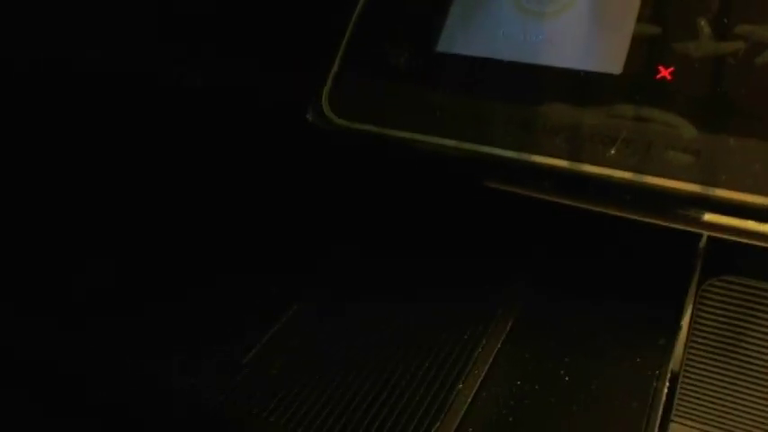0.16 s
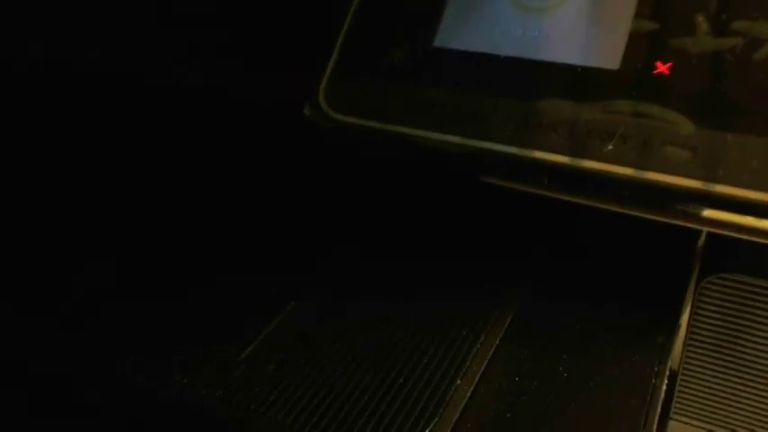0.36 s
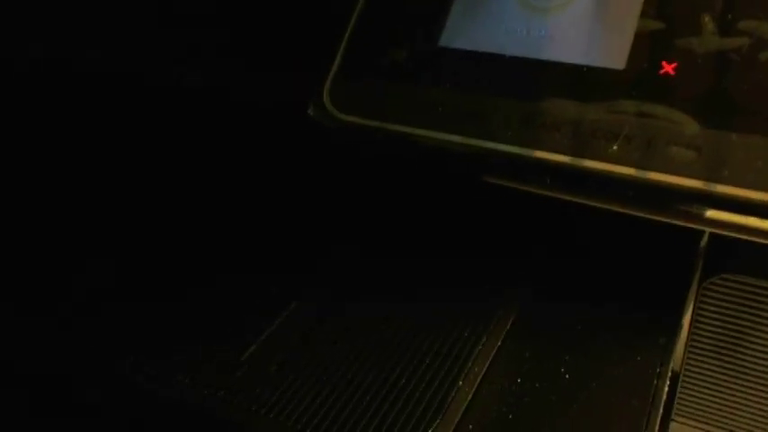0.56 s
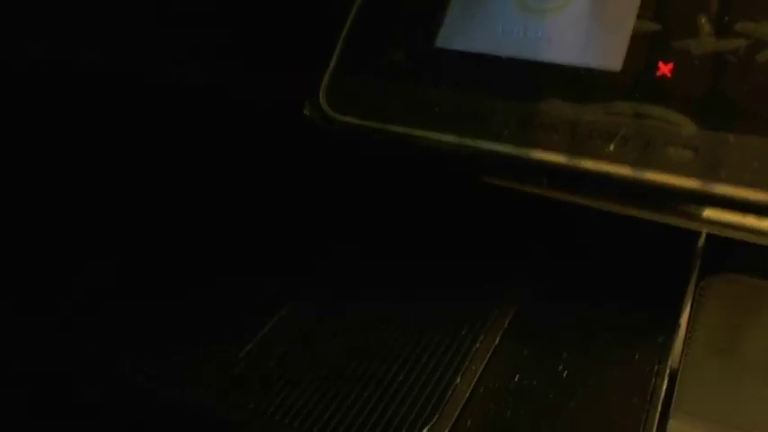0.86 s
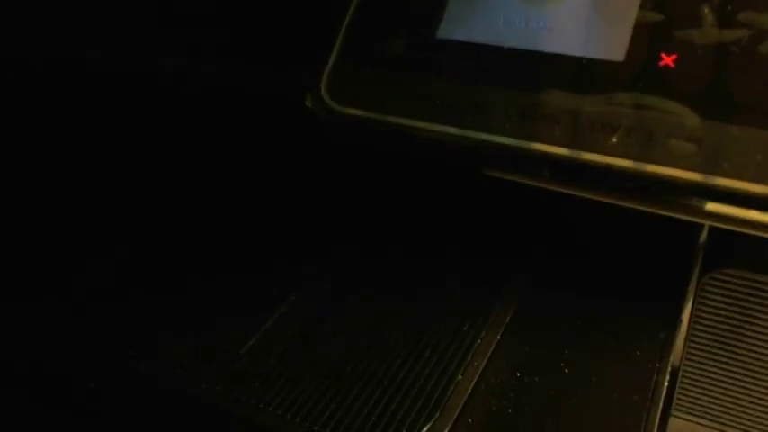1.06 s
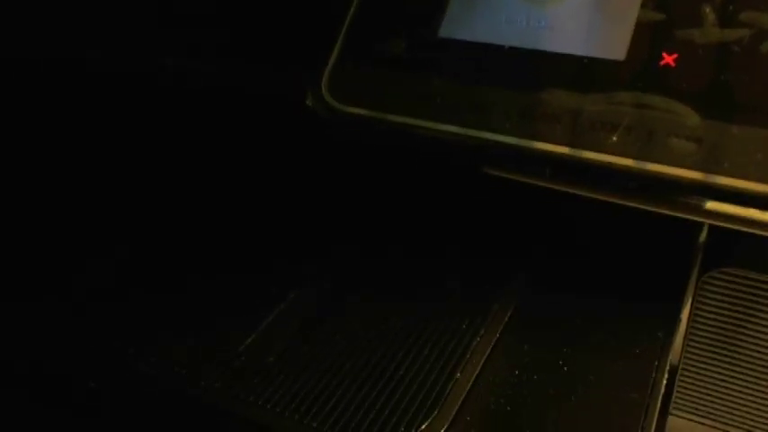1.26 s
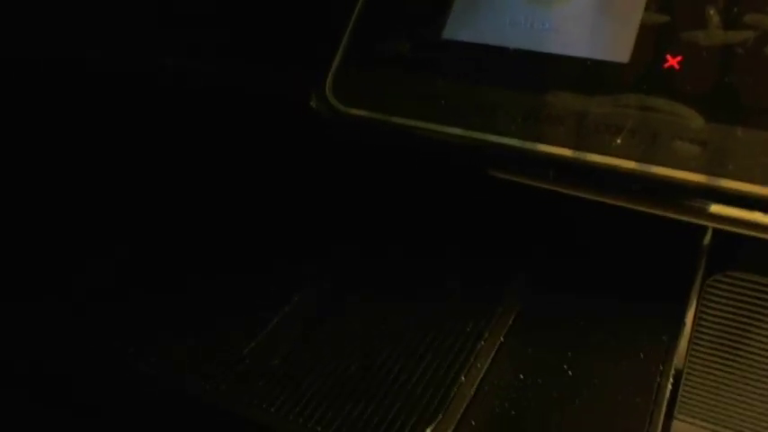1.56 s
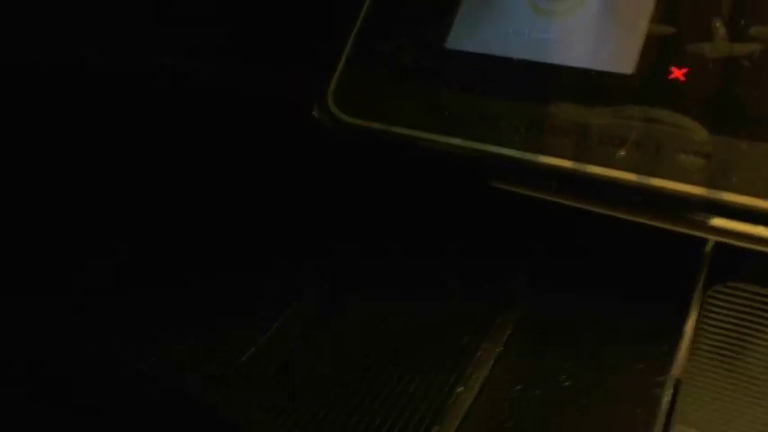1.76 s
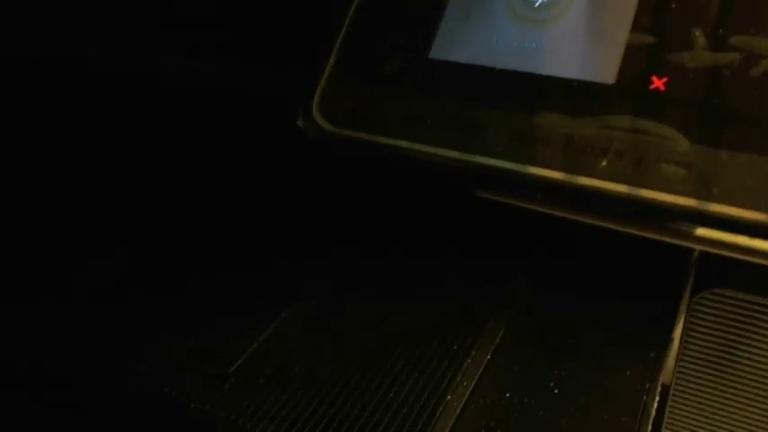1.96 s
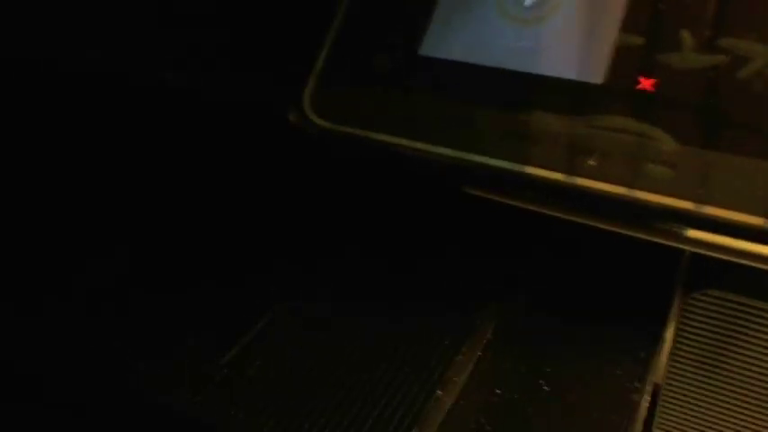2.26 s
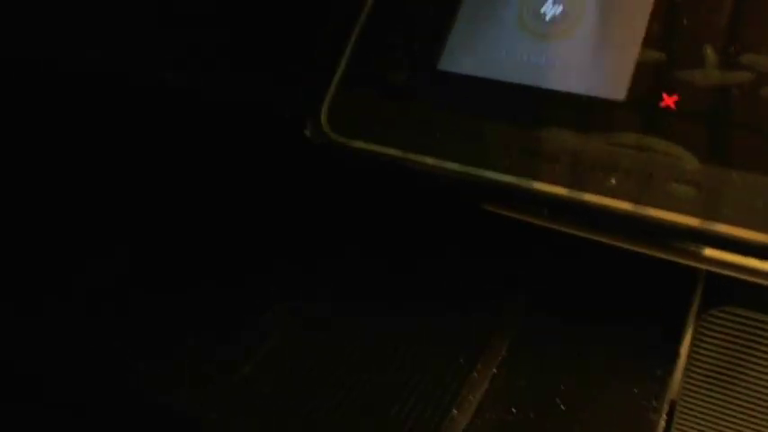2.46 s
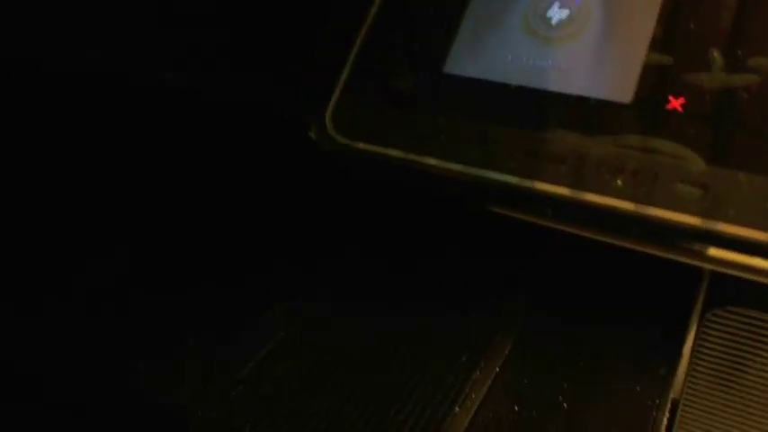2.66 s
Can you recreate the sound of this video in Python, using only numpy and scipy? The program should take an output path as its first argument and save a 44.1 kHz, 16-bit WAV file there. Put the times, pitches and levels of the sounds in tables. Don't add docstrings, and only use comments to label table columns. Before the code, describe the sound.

Inkjet printer heard close on a phone indoors: thin motor whine and low hum, a rail squeal in the first second, then four evenly spaced ticks each followed by a rattling plastic clack; hum swells near the end.

```python
import sys
import numpy as np
from scipy import signal
from scipy.fft import rfft, irfft, next_fast_len
from scipy.io import wavfile
from scipy.ndimage import uniform_filter1d, map_coordinates

SR = 44100
rng = np.random.default_rng(int(sys.argv[2]) if len(sys.argv) > 2 else 0)


def transcribe(u):
    v = np.clip(np.atleast_2d(u).T, -1, 1)
    q = np.round(v * 32767).astype(np.int16)
    wavfile.write(sys.argv[1], SR, q)


def field_ratio(decibels):
    return 10 ** (np.asarray(decibels, dtype=float) / 20)


N = 123479
T = np.arange(N) / SR


def unit(x):
    return x / np.sqrt(np.mean(x ** 2) + 1e-20)


def noise():
    return rng.standard_normal(N)


def curves(rows):
    s, *cols = np.transpose(rows)
    return [np.interp(T, s, c) for c in cols]


def wobble(rate_hz):
    return map_coordinates(rng.standard_normal(2000), [T * rate_hz])


def filtered(x, response):
    m = next_fast_len(N + SR // 2)
    return irfft(rfft(x, m) * response(np.fft.rfftfreq(m, 1 / SR)), m)[:N]


def shaped(points):
    f, v = np.transpose(points)
    return lambda hz: field_ratio(np.interp(np.log(hz + 1), np.log(f + 1), v))


def body(peaks):
    def response(f):
        total = 0
        for k, (c, w, db) in enumerate(peaks):
            total = total + (-1) ** k * field_ratio(db) * 1j * f * w / (c * c - f * f + 1j * f * w)
        return total
    return response


def patchy(patchy_db):
    z = signal.stft(rng.standard_normal(N + 512), nperseg=512)[2]
    field = uniform_filter1d(uniform_filter1d(rng.standard_normal(z.shape), 5, 0), 10, 1)
    return signal.istft(z * field_ratio(patchy_db * unit(field)), nperseg=512)[1][:N]


def tone(hz):
    return np.sqrt(2) * np.sin(2 * np.pi * np.cumsum(hz + 0 * T) / SR + rng.uniform(0, 2 * np.pi))


def fall(start_s, t60_s, attack_s):
    t = np.clip(T - start_s, 0, None)
    return (1 - np.exp(-t / attack_s)) * field_ratio(-60 * t / t60_s)


# time in seconds, pitch in Hz, level in dB.
HUM_CURVE = [(0, 92.1, -44.5), (.2, 92.2, -47), (.35, 90.8, -46), (.6, 89.83, -46.5), (1.2, 89.27, -48),
             (1.42, 89.53, -46), (1.75, 91.68, -49.5), (1.9, 89.37, -43.5), (2.2, 89.86, -35),
             (2.23, 90.6, -35.5), (2.27, 88.62, -32), (2.8, 89.85, -33.5)]
# frequency in Hz, level in dB per Hz.
RUMBLE_SPECTRUM = [(20, -18), (55, -6.5), (120, -10.5), (200, -15.5), (300, -21)]


def hum():
    hz, db = curves(HUM_CURVE)
    swing = np.sqrt(2) * np.cos(2 * np.pi * (np.cumsum(hz) - hz.sum()) / SR)
    flutter_db = 1.3 * wobble(30) + 0.8 * wobble(110)
    rumble = unit(filtered(noise(), shaped(list(RUMBLE_SPECTRUM) + [(400, -108.5)])))
    rumble_db = -51 + 0.51 * (db - db.mean()) + 0.38 * wobble(7.18)
    return field_ratio(db + flutter_db) * swing + field_ratio(rumble_db) * rumble


# time in seconds, tooth rate in Hz.
TOOTH_RATE = [(0, 358.8), (.2, 355.8), (.4, 356.2), (.6, 355.8), (.8, 359.7), (.95, 358), (1.15, 358.4),
              (1.6, 359.5), (1.9, 357.9), (2.2, 359.1), (2.45, 361), (2.8, 360.7)]
# multiple of the tooth rate, level in dB.
MOTOR_ORDERS = [(1, -71), (2, -62), (3, -68), (5, -65), (6, -72), (7, -66), (8, -75.5)]
# pitch in Hz, level in dB.
STEADY_LINES = [(1527, -71)]
# frequency in Hz, level in dB per Hz.
WHIRR_SPECTRUM = [(200, -7), (350, -6.5), (700, -10.5), (1850, -11.5), (2900, -16), (4960, -24),
                  (6000, -29.5), (7500, -35)]


def motor():
    hz, = curves(TOOTH_RATE)
    out = np.zeros(N)
    for k, db in MOTOR_ORDERS:
        out += field_ratio(db + 1.1 * wobble(19)) * tone(k * (hz + 0.5 * wobble(25)))
    for f, db in STEADY_LINES:
        out += field_ratio(db + 2 * wobble(19)) * tone(f + 3 * wobble(25))
    whirr = unit(filtered(patchy(patchy_db=2.0), shaped([(120, -80.5)] + list(WHIRR_SPECTRUM))))
    return out + field_ratio(-54.5 + 0.47 * wobble(3.7)) * whirr


# time in seconds, level in dB.
DRAG_LEVEL = [(0, -59), (.3, -55), (.42, -53), (.6, -52), (.7, -61.5), (.77, -51.5), (.97, -51),
              (1.15, -61), (1.3, -78), (2.2, -70), (2.32, -55), (2.6, -52), (2.7, -51.5), (2.8, -59)]
# frequency in Hz, width in Hz, level in dB.
BELT_MODES = [(782, 163, -2.5), (937, 42, 2), (1350, 980, -12)]


def belt():
    db, = curves(DRAG_LEVEL)
    return field_ratio(db + 0.51 * wobble(25)) * unit(filtered(patchy(patchy_db=1.5), body(BELT_MODES)))


# time in seconds, pitch in Hz, level in dB.
PANEL_CURVE = [(2.2, 925, -85), (2.3, 925, -62), (2.5, 930, -62), (2.68, 940, -56), (2.8, 945, -55)]


def panel():
    hz, db = curves(PANEL_CURVE)
    return field_ratio(db + 2.5 * wobble(50)) * tone(hz + 25 * wobble(90))


# time in seconds, level in dB.
HISS_LEVEL = [(0, -58), (.45, -57.5), (.7, -65.5), (.8, -62.5), (1.1, -58), (1.2, -73)]
# frequency in Hz, width in Hz, level in dB.
RAIL_MODES = [(4130, 1860, 0)]


def rail_hiss():
    db, = curves(HISS_LEVEL)
    return field_ratio(db) * unit(filtered(patchy(patchy_db=1.5), lambda f: body(RAIL_MODES)(f) ** 2))


# time in seconds, pitch in Hz, level in dB.
SQUEAL_CURVE = [(0, 4250, -61), (.08, 4240, -58), (.17, 4240, -63), (.204, 4235, -55), (.23, 4225, -64),
                (.29, 4220, -55), (.308, 4220, -61), (.325, 4250, -54), (.37, 4290, -59), (.395, 4430, -56),
                (.505, 4505, -56), (.535, 4500, -66), (.57, 4520, -62), (.65, 4550, -64), (.7, 4520, -71),
                (.78, 4470, -63), (.84, 4450, -66), (1, 4300, -90)]
# time in seconds, centre in Hz, level in dB.
SCRAPE_CURVE = [(2.6, 5300, -64), (2.65, 5250, -58), (2.69, 5020, -52.5), (2.725, 4880, -48.5),
                (2.76, 4850, -51), (2.8, 4850, -52.5)]


def rail():
    jitter_hz, scrape_width_hz, core_db = 28, 360, -9
    hz, db = curves(SQUEAL_CURVE)
    squeal = field_ratio(db + 3.4 * wobble(60)) * tone(hz + jitter_hz * wobble(170))
    hz, db = curves([(2.5, 15000, -84.0)] + list(SCRAPE_CURVE))
    band = unit(filtered(noise(), lambda f: np.exp(-(f / scrape_width_hz) ** 2)))
    return squeal + field_ratio(db) * (band + field_ratio(core_db)) * tone(hz + jitter_hz * wobble(150))


# start in seconds, level in dB, pitch in Hz, T60 in seconds.
CASE_BUMPS = [
    (.0, -45, 303, 0.38),
    (0.077, -45, 470, 0.3),
    (0.333, -48, 292, 0.23),
    (0.701, -48, 306, 0.34),
    (1.056, -45.5, 623, 0.56),
    (1.41, -60, 298, 0.34),
    (1.877, -40, 280, 0.069),
    (0.551, -58.5, 1350, 0.56),
    (1.801, -52, 533.6, 0.38),
]


def bumps():
    out = np.zeros(N)
    for s, db, hz, t60_s in CASE_BUMPS:
        dull = unit(filtered(noise(), lambda f: body([(hz, .45 * hz, 0)])(f) ** 2))
        out += field_ratio(db) * fall(s, t60_s, attack_s=0.0019) * dull
    return out


# start in seconds, ring in dB, rustle in dB, extra above 5 kHz in dB.
TURNS = [
    (0.074, -44, -53, 0),
    (.834, -49.5, -58, 1),
    (1.574, -46, -59.5, 1),
    (2.3407, -47, -65.5, 3),
]
# pitch in Hz, level in dB, T60 in seconds, lag in seconds.
TICK_PARTIALS = [(3450, 5, .05, .004), (3767, 5, .04, .004), (5340, 5, .04, 0), (6130, 4, .04, .001),
                 (6900, -5, .04, .001), (4200, -3, .06, .005)]
# frequency in Hz, level in dB per Hz.
RUSTLE_SPECTRUM = [(1200, -35.5), (2000, -5), (3500, -13.5), (5500, 5.5), (7300, 3.5)]


def ticks():
    attack_s, blur_hz = .0012, 45
    bounce_s, bounce_db = .022, -9.5
    rustle_lag_s, rustle_half_s = 0.014, 0.09
    rustle = unit(filtered(noise(), shaped(RUSTLE_SPECTRUM)))
    out = np.zeros(N)
    for s, db, rustle_db, bright_db in TURNS:
        for hz, level, t60_s, lag_s in TICK_PARTIALS:
            contact = fall(s + lag_s, t60_s, attack_s)
            bounce = field_ratio(bounce_db) * fall(s + lag_s + bounce_s, t60_s, attack_s)
            gain = field_ratio(db + level - 10.5 + bright_db * (hz > 5000))
            out += gain * tone(hz + blur_hz * wobble(400)) * (contact + bounce)
        out += field_ratio(rustle_db) * np.exp(-((T - s - rustle_lag_s) / rustle_half_s) ** 2) * rustle
    return out


# start in seconds, level in dB, hold in seconds, thud in dB, clatter in dB.
FEED_EVENTS = [
    (0.213, -38.5, 0.037, 4.5, 6.5),
    (0.991, -35.5, 0.043, 1.5, 0.5),
    (1.75, -35.5, 0.041, 4.5, 1.5),
    (2.525, -39, 0.04, 9, 6),
]
# frequency in Hz, width in Hz, level in dB.
CASE_MODES = [(289, 79, 2.5), (400, 70, -9.5), (470, 45, 0)]
GEAR_MODES = [(714, 196, 3), (1070, 82, 4), (1296, 150, 3.5), (1780, 140, -3.5)]
CLATTER_MODES = [(2510, 260, -10), (2875, 270, -9.5), (3750, 800, -14), (4480, 320, -14), (5820, 2030, -24)]


def feeds():
    impacts_per_s, spread_db = 1200, 1.4
    lead_s, lead_db, attack_s = .03, -12, .006
    release_t60_s, tail_db, tail_t60_s = 0.23, -12, 0.29
    struck = rng.random(N) < impacts_per_s / SR
    hits = struck * rng.choice([-1, 1], N) * field_ratio(spread_db * rng.exponential(size=N))
    drive = unit(unit(hits) + 0.8 * noise())
    scale = np.std(filtered(drive, body(GEAR_MODES)))
    out = np.zeros(N)
    for s, db, hold_s, thud_db, bright_db in FEED_EVENTS:
        after = np.clip(T - s - hold_s, 0, None)
        lead_in = field_ratio(lead_db) * np.clip((T - s + lead_s) / lead_s, 0, 1)
        rise = lead_in + np.clip((T - s) / attack_s, 0, 1)
        decay = field_ratio(-60 * after / release_t60_s) + field_ratio(tail_db - 60 * after / tail_t60_s)

        def parts(f):
            thud = field_ratio(4 + thud_db) * body(CASE_MODES)(f) * body([(340, 250, 0)])(f) ** 2
            return thud - field_ratio(-2.5) * body(GEAR_MODES)(f) + field_ratio(bright_db) * body(CLATTER_MODES)(f)

        out += field_ratio(db - 6.5) * filtered(drive * rise * decay, parts) / scale
    return out


# start in seconds, peak in dB, pitch in Hz.
CASE_HITS = [(0.227, -33, 334), (0.232, -32, 368), (0.244, -26.5, 332), (0.988, -29.5, 355),
             (0.997, -34, 343), (1.002, -38, 375), (1.01, -31, 348), (1.02, -27.5, 344.6),
             (1.026, -54, 327), (1.041, -32, 326), (1.76, -28.5, 365), (1.767, -32, 339), (1.781, -39, 352),
             (1.794, -39, 356), (2.516, -30, 322), (2.522, -43, 370), (2.533, -36, 356), (2.546, -31, 324),
             (2.551, -28, 367), (2.564, -40.5, 387), (2.572, -39, 347), (2.582, -35.5, 342),
             (2.588, -37, 378), (2.604, -34, 312)]
GEAR_HITS = [(0.224, -32, 874), (0.228, -37, 870), (0.233, -34, 920), (0.242, -30.5, 710),
             (0.98, -37.5, 770), (0.987, -35, 652), (0.996, -34, 900), (1.003, -27.5, 790),
             (1.006, -37, 825), (1.017, -35, 854), (1.022, -30, 760), (1.032, -38, 760), (1.038, -42, 790),
             (1.042, -40, 880), (1.05, -35, 805), (1.064, -36, 710), (1.072, -44, 744), (1.077, -39, 700),
             (1.084, -49, 694), (1.093, -45, 694), (1.771, -27.5, 840), (1.775, -28, 773),
             (1.782, -27.5, 750), (2.562, -30.5, 800)]
PAWL_HITS = [(0.223, -37.5, 1337), (0.238, -34.5, 1393), (0.248, -42, 1370), (0.265, -41.5, 1405),
             (0.274, -39, 1427), (0.996, -35, 1343), (1.014, -32.5, 1304), (1.02, -49, 1360),
             (1.041, -42.5, 1320), (1.76, -30, 1372), (1.77, -28, 1367), (2.547, -28.5, 1347),
             (2.553, -40, 1390), (2.561, -43.5, 1460)]
# start in seconds, peak in dB, pitch in Hz.
EXTRA_HITS = [
    (.203, -34, 302),
    (.213, -33.5, 324),
    (.218, -42, 420),
    (.283, -40, 740),
    (.981, -39, 780),
    (1.752, -33, 397),
    (2.364, -42, 2840),
    (.269, -42, 2570),
]


def blows():
    attack_s, lead_s = .0008, .0013
    out, t = np.zeros(N), np.arange(SR // 8) / SR
    struck = [(CASE_HITS, 0.024, 1.5), (GEAR_HITS, 0.026, 2.5),
              (PAWL_HITS, 0.054, 1.5), (EXTRA_HITS, 0.024, 1.5)]
    for rows, t60_s, part_db in struck:
        for s, db, hz in rows:
            envelope = (1 - np.exp(-t / attack_s)) * field_ratio(db + part_db - 60 * t / t60_s)
            out[round((s - lead_s) * SR):][:len(t)] += envelope * np.sin(2 * np.pi * hz * t)
    return out


def scene():
    background = hum() + motor() + belt() + panel() + rail_hiss() + rail()
    return (background + bumps() + ticks() + feeds() + blows())[None]


# frequency in Hz, threshold in dB under the masking level.
GATE_THRESHOLD = [(1500, -45), (4500, -24), (5200, -13.5), (6000, -12.5), (7000, -14), (8000, -19)]


def phone(x):
    band_bins = 16
    how = dict(window="cosine", nperseg=5644)
    hz, s, z = signal.stft(x, SR, **how)
    size = np.abs(z) + 1e-12
    peak_db = 20 * np.log10(np.percentile(size[(hz > 4100) & (hz < 5200)], 98, axis=0))
    mask_db = peak_db.mean() + 0.8 * (peak_db - peak_db.mean())
    mask_db = mask_db + 5 * ((s > .33) & (s < .76))
    middle = np.arange(len(hz)) // band_bins * band_bins + band_bins // 2
    middle = np.minimum(middle, len(hz) - 1)
    scatter_db = 4 * unit(uniform_filter1d(rng.standard_normal(z.shape), size=3))[middle]
    band = uniform_filter1d(size, size=band_bins, axis=0)[middle] * field_ratio(scatter_db)
    lone_line = field_ratio(-4.5) * uniform_filter1d(size, size=3, axis=0)
    threshold = shaped(GATE_THRESHOLD)(hz)[:, None] * field_ratio(mask_db)
    ratio = np.maximum(band, lone_line) / threshold
    keep = field_ratio(-27) + 1 / (1 + ratio ** -12)
    return signal.istft(z * keep, SR, **how)[1][:N]


# start in seconds, end in seconds, pitch in Hz, level in dB.
STRAY_LINES = [(.31, .44, 6536, -85), (.31, .4, 5636, -86), (.44, .58, 5895, -82), (.5, .78, 5753, -87),
               (.62, .78, 5543, -90), (.45, .7, 5350, -82), (.45, .65, 5203, -80), (1.22, 1.42, 7380, -90),
               (1.52, 1.67, 9070, -88), (1.73, 1.86, 7809, -85), (1.73, 1.86, 7927, -86),
               (2.3, 2.41, 8598, -85), (2.29, 2.42, 7398, -85), (1.9, 2.17, 6500, -88)]


def strays():
    out = np.zeros(N)
    for start, end, hz, db in STRAY_LINES:
        swell = np.sin(np.pi * np.clip((T - start) / (end - start), 0, 1))
        out += field_ratio(db) * swell * tone(hz)
    return out


# frequency in Hz, level in dB.
MIRROR_GAIN = [(8000, -3), (9500, 9.5), (12000, 1), (14000, -10.5), (15000, -25.5), (15600, -38),
               (15900, -68)]


def mirror(x):
    return field_ratio(-29) * filtered(x * np.cos(2 * np.pi * 16000 * T), shaped(MIRROR_GAIN))


def top_cut(x):
    return signal.sosfilt(signal.butter(12, 15720, fs=SR, output="sos"), x)


# frequency in Hz, gain in dB.
MIC_GAIN = [(100, 0), (6500, 0), (7300, -4), (7700, -14), (8000, -30), (8300, -70)]


def record(dry):
    x = phone(filtered(dry[0], shaped(MIC_GAIN)))
    mix = x + strays() + mirror(x) + field_ratio(-90) * noise()
    return top_cut(mix[None])


dry = scene()
out = record(dry)
transcribe(out)
```